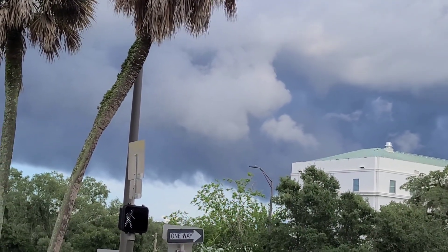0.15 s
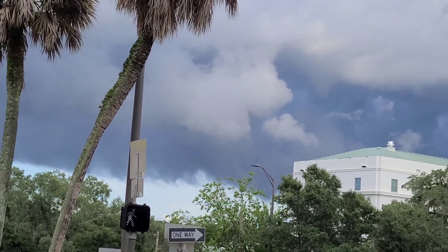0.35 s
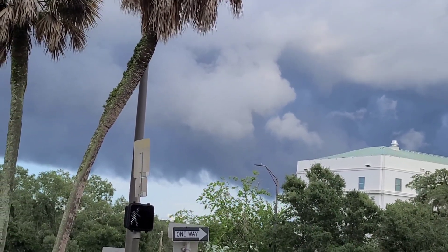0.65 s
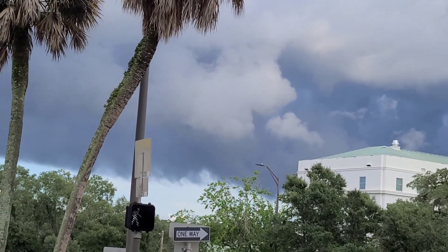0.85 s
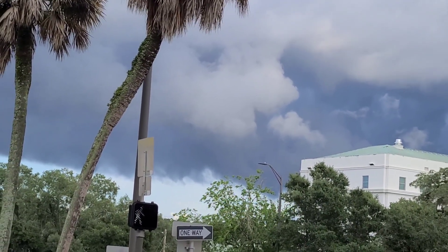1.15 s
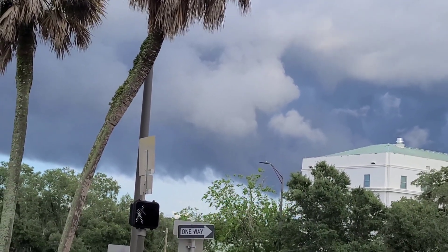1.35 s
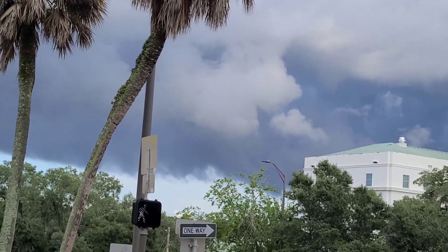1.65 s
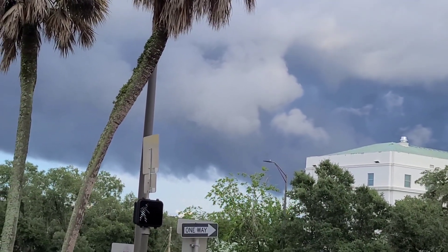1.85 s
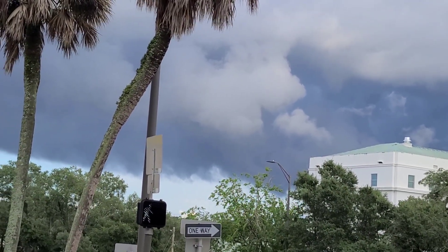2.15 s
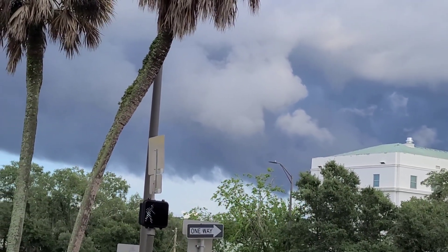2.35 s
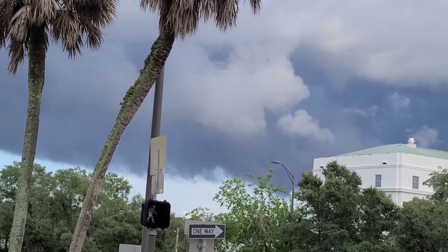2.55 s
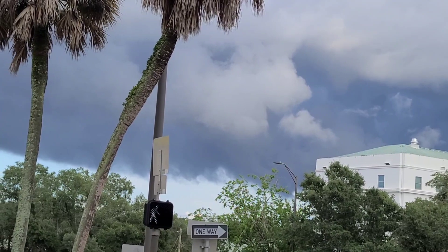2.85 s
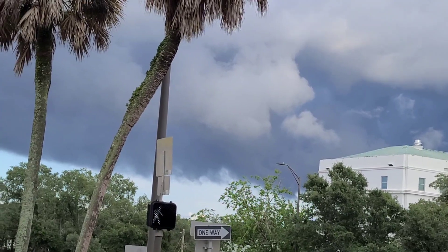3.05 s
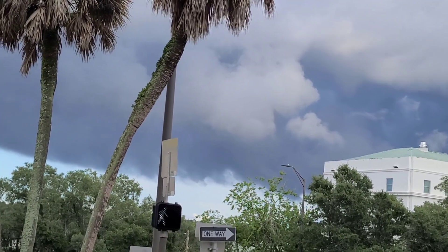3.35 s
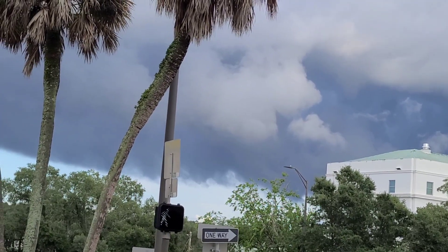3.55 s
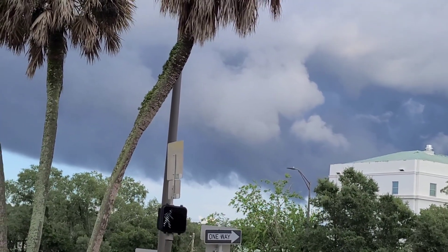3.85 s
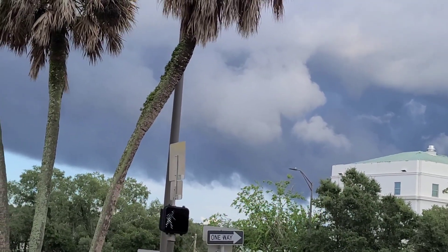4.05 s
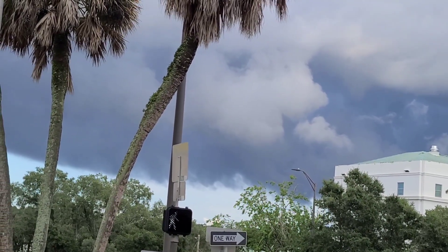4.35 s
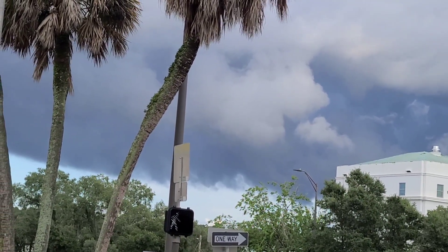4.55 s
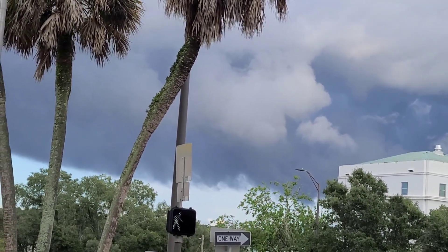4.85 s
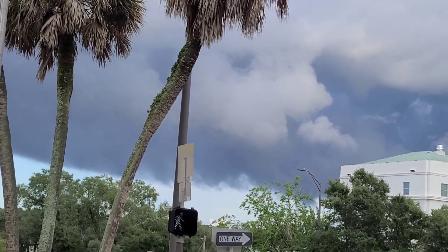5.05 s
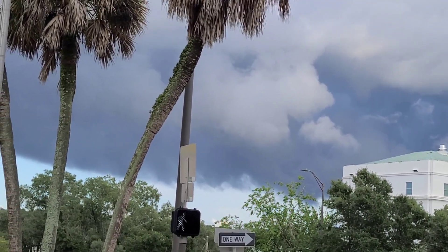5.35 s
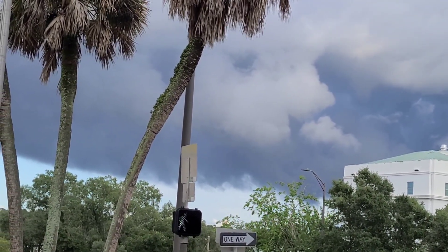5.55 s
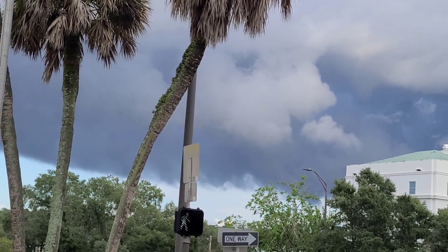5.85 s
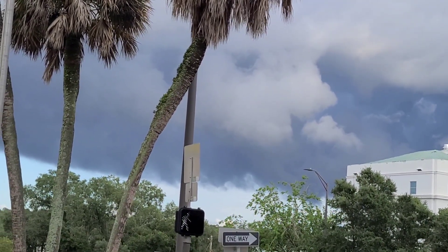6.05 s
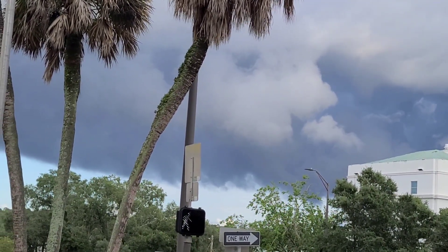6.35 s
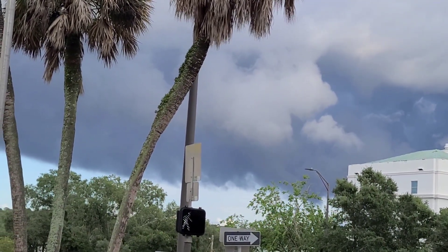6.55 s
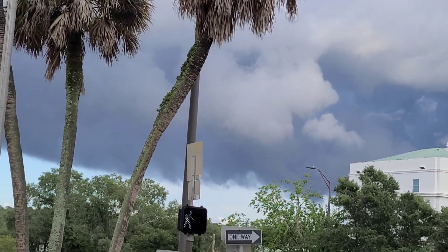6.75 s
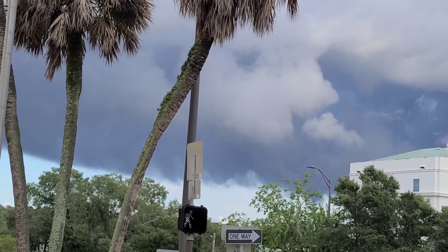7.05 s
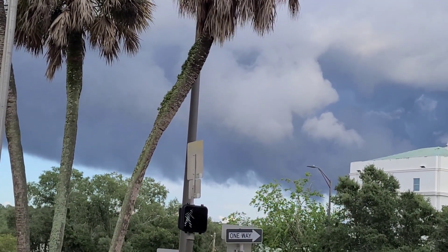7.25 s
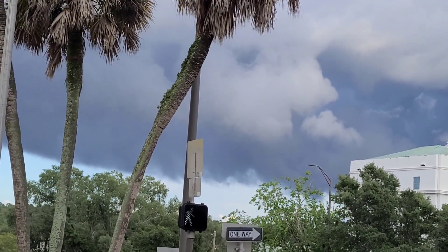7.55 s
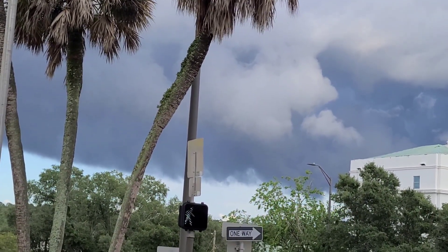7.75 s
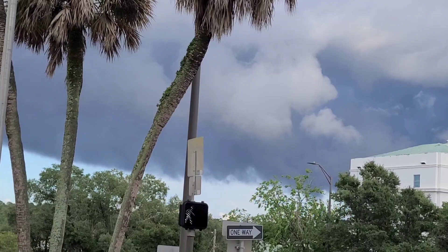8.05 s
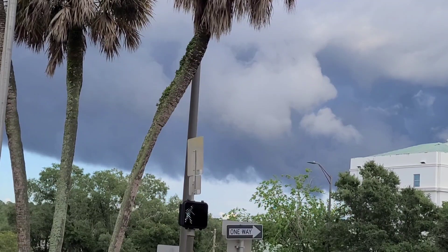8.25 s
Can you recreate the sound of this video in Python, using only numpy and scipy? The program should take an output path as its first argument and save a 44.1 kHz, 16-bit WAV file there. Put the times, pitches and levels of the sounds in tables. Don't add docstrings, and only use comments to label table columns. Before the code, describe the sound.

City street rumble with an idling engine; a loud-exhaust V8 car approaches in throttle pushes, passes burbling and rasping, then slows with thin brake squeal.

```python
import sys
import numpy as np
from scipy import signal
from scipy.io import wavfile
from scipy.ndimage import uniform_filter1d

SR = 44100
rng = np.random.default_rng(int(sys.argv[2]) if len(sys.argv) > 2 else 0)


def linear_from_db(decibels):
    return 10 ** (np.asarray(decibels, float) / 20)


def to_wav(sig):
    pcm = np.clip(np.atleast_2d(sig), -1, 1) * 32767
    pcm = np.round(pcm).astype(np.int16)
    wavfile.write(sys.argv[1], SR, pcm.T)


N = 370881
SLOW = 20

# frequency in Hz, likeness from 0 to 1.
LIKENESS = [(60, 0.97), (180, .985), (300, .97), (520, 0.78), (890, 0.42), (1500, 0.45), (3000, 0.38),
            (12000, 0.25)]
# frequency in Hz, lead in radians.
LEFT_LEAD = [(0, 0), (430, .2), (750, .3), (1300, 1.3), (3000, 9.8), (14000, 45.9)]
# frequency in Hz, left over right in dB.
LEFT_LEAN = [(60, 0.6), (140, 1), (320, 1.5), (490, 5.5), (740, -1), (1130, -0.5), (1710, -6), (2600, -2),
             (5000, -5), (9000, 0.2), (13000, -9)]

# time in seconds, engine cycles per second in Hz.
ENGINE_SPEED = [(0, 15.83), (3.1, 20.1), (3.33, 20.06), (3.65, 18.19), (4.05, 18.3), (5.02, 19.2),
                (5.23, 17.25), (6.1, 17.3), (6.25, 16.95), (6.5, 17.7), (6.66, 17.5), (6.88, 15.55),
                (7.06, 15.07), (7.45, 15.45), (7.61, 15.27), (7.94, 14.4), (8.27, 14.93), (8.41, 14.88)]
# time in seconds, nearness in dB, engine load in dB.
CAR_COURSE = [(0, -39.5, -55), (.4, -41, -29.5), (1, -40, -40), (2, -39, -35.5), (2.6, -40.5, -35),
              (3.2, -36.5, -33), (3.9, -36, -28.5), (4.3, -36, -27.5), (4.75, -33.5, -25),
              (5.1, -30, -18.5), (5.5, -30, -22.5), (5.85, -29, -21), (6.2, -31, -26), (6.6, -31.5, -25.5),
              (6.9, -31, -22.5), (7.35, -31.5, -29), (7.7, -34, -33.5), (8.41, -38, -28)]

# frequency in Hz, level in dB per Hz.
BOOM_COLOUR = [(12, -34), (20, -10.5), (31, -6), (38, -9.5), (48, -8), (64, -2), (86, -7), (100, -6.5),
               (108, -35), (130, -30), (170, -62), (290, -120)]
DISTANT_COLOUR = [(59, -32), (100, 4), (113, -15.5), (160, -3.5), (242, -13), (269, -20), (297, -15),
                  (324, -22.5), (600, -23), (780, -43.5), (1320, -120)]
ROAR_COLOUR = [(520, -2), (600, -11.5), (660, -3.5), (730, -3), (800, -2.5), (870, -12.5), (960, -27.5),
               (1050, -28)]
TYRE_COLOUR = [(850, -15), (1000, -6), (1270, -5.5), (1560, -1), (1750, -4.5), (2000, -10), (2400, -12.5),
               (2700, -21.5), (2900, -26)]
CLATTER_COLOUR = [(850, 0), (950, 0.5), (1100, 0.5), (1250, -3.5), (1450, -5.5)]
AIR_COLOUR = [(2600, 4), (3200, -4), (4000, -5), (4500, -7.5), (5200, -10.5), (6200, -19), (7300, -25.5),
              (8000, -21), (8700, -19.5), (9600, -28), (10400, -15), (11200, -28.5), (12200, -29.5),
              (12900, -40)]
HISS_COLOUR = [(2600, 4.5), (3200, 2.5), (4000, -5.5), (4500, -6.5), (5200, -10), (6200, -12), (7300, -16),
               (8000, -20), (8700, -11.5), (9600, -19.5), (10400, -17.5), (11200, -20), (12200, -28),
               (12900, -40)]
WHISTLE_COLOUR = [(8400, -18.5), (8650, -5), (8750, -1), (8900, 9.5), (9200, -15.5)]
SIZZLE_COLOUR = [(13000, -6), (13400, 0), (13600, -6.5)]

# centre in seconds, peak level in dB, half length in seconds.
BOOM_THUMPS = [(0, -24.5, 0.077), (1.3, -23, 0.14), (1.8, -27.5, 0.15), (2.3, -26, 0.22),
               (2.8, -22.5, 0.11), (3.3, -22.5, 0.19), (3.8, -26, 0.22), (4.3, -27.5, 0.32),
               (6.3, -21, 0.22), (8, -34.5, 0.6)]
TYRES_PASSING = [(0, -47, 0.23), (3.4, -53.5, 0.17), (5, -40.5, 0.79), (5.95, -37.5, 0.68),
                 (7, -37.5, 0.48), (7.6, -37.5, 0.41), (8.2, -38.5, 0.43)]
HISS_SWISHES = [(0, -64.5, 0.43), (.8, -69.5, 0.93), (4.55, -62.5, 0.49), (5.3, -68.5, 0.22),
                (5.8, -58, 0.32), (8.41, -58, 0.32)]
CLATTER_SWELLS = [
    (5.08, -40, 0.11),
    (6.35, -44.5, .12),
    (8.05, -41.5, 0.26),
]
WHISTLE_SWELLS = [(3.3, -79, .4), (4.15, -69.5, .25), (5, -73, 0.43), (6.15, -62, .25), (6.6, -73, 0.14)]
SIZZLE_SWELLS = [
    (5.55, -82, .05),
    (5.8, -76.5, .12),
]
TREAD_SWELLS = [(4.7, -44.5, .3), (5.9, -35.5, 0.38), (6.25, -42, 0.092), (6.9, -44.5, .2),
                (7.7, -41.5, 0.64), (8.3, -42.5, 0.27)]
# time in seconds, frequency in Hz.
TREAD_HZ = [(0, 1515), (5.2, 1540), (5.5, 1400), (5.9, 1550), (6.3, 1604), (6.7, 1514), (8.41, 1575)]

# centre in seconds, frequency in Hz, half length in seconds, level in dB, left over right in dB.
KNOCK_RINGS = [(2.745, 1000, .0025, -31, -5), (2.744, 2050, .0012, -33, -5), (2.7435, 2900, .001, -39, -5),
               (2.774, 2100, .0015, -39, -3), (3.971, 1880, .0015, -31, -8), (3.972, 2750, .0025, -34, -2),
               (3.971, 3100, .0015, -38, -9), (3.972, 3450, .002, -40, -9), (3.971, 2300, .0015, -35, 2),
               (3.977, 2200, .002, -31, -3), (3.982, 1820, .004, -34, -1), (3.979, 1350, .005, -30, -11),
               (3.991, 1400, .005, -33, -10), (3.982, 1600, .003, -40, 4), (3.988, 2150, .003, -41, -8),
               (3.993, 2350, .004, -42, 5), (3.985, 2750, .004, -44, 0), (4.0, 1750, .004, -40, -6),
               (3.975, 3900, .003, -48, 4)]
# start in seconds, level in dB, left over right in dB.
KNOCK_BODIES = [
    (2.7427, -48, -6),
    (3.9693, -40, -5.5),
]
# start in seconds, low edge in Hz, high edge in Hz, level in dB, time to fall 60 dB in seconds.
KNOCK_PUFFS = [
    (2.7427, 7200, 9500, -52, .02),
    (2.7427, 1200, 2900, -39, .015),
    (3.5723, 7600, 11000, -51, .014),
    (3.5723, 11000, 14300, -54, .014),
    (3.812, 8000, 9200, -60, .02),
    (3.82, 13800, 14300, -74, .15),
    (3.9695, 7400, 9800, -51, .06),
    (3.9695, 1600, 2900, -37, .02),
]
# centre in seconds, peak level in dB, half length in seconds.
BRAKE_GRABS = [(7.45, -68, .05), (7.54, -66, .04), (7.67, -69, .05), (7.77, -62, .045), (7.84, -62, .03),
               (7.9, -65, .03), (7.96, -67, .03), (8.08, -73, .06), (8.2, -70, .04), (8.27, -64, .035),
               (8.34, -60, .03), (8.4, -61, .035)]
# time in seconds, frequency in Hz.
BRAKE_HZ = [(7.45, 9392), (7.56, 9410), (7.77, 9365), (7.96, 9395), (8.22, 9378), (8.41, 9366)]

# frequency in Hz, level in dB.
IDLE_HUM = [(43.6, -29.5), (87.2, -36)]
# time in seconds, level in dB.
LOPE_LEVEL = [(4, -34.5), (5.3, -38), (6.0, -49), (6.3, -22.5), (6.5, -25), (6.65, -46), (6.8, -24),
              (7.1, -37.5), (7.4, -30.5)]

NEIGHBOUR_ORDERS = [(9, 3.5), (10, -10), (12, -5), (13, -4), (14, -8.5)]
OVERTONE_ORDERS = [(15, -16), (16, 0.5), (17, -3.5), (18, -10), (19, -3.5), (20, -3.5)]
RASP_ORDERS = [(21, -6.5), (22, -1), (23, 2), (24, -6), (25, -1.5), (26, -3.5), (27, -7.5), (28, -1),
               (29, -1), (30, -1.5), (31, -6), (32, -3.5)]
# time in seconds, centre in Hz, width in Hz, roughness from 0 to 1.
TAIL_PIPE = [(0, 380, 140, 0.67), (3, 408, 112.4, 0.95), (4.502, 420, 150.4, 0.82), (5.2, 437, 129, 0.68),
             (5.45, 401, 90, 0.4), (6.15, 453, 110, 0.73), (6.4, 458, 100.5, 0.7), (6.8, 480, 71, 0.8),
             (7.4, 452, 123, 1), (7.9, 300, 70, 0.91), (8.41, 330, 80.5, 0.93)]

# centre in seconds, peak level in dB, half length in seconds.
FIRING_PUSHES = [(.25, -28.5, 0.077), (1.4, -39.5, 0.4), (2.2, -20.5, 0.13), (2.4, -26, 0.11),
                 (2.56, -25, 0.13), (2.93, -23, 0.16), (3.22, -27, 0.22), (3.57, -16, 0.074),
                 (3.74, -29.5, 0.23), (4.17, -15.5, 0.12), (4.41, -24.5, .1), (4.63, -16, 0.14),
                 (4.95, -10.5, 0.25), (5.15, -13.5, .06), (5.29, -18, 0.066), (5.6, -18, 0.14),
                 (5.92, -17, 0.12), (6.05, -17, 0.081), (6.18, -14, 0.08), (6.4, -13.5, 0.11),
                 (6.55, -13, 0.1), (6.68, -12.5, 0.09), (6.8, -25, .05), (7.22, -33.5, 0.1),
                 (7.45, -34, 0.14), (8.3, -30.5, .12)]
BURBLE_SWELLS = [(.5, -37, 0.062), (1.15, -41, 0.15), (2.19, -28, 0.04), (2.6, -34, 0.22),
                 (3.12, -30, 0.12), (3.29, -27, 0.054), (3.78, -21, 0.1), (4.36, -23, 0.2),
                 (4.64, -21, 0.14), (4.82, -18.5, 0.052), (4.97, -22, 0.1), (5.11, -25.5, .06),
                 (5.28, -14.5, 0.098), (5.52, -16, 0.19), (5.75, -16.5, .11), (5.95, -20, 0.075),
                 (6.1, -20, 0.089), (6.36, -21, 0.065), (6.56, -17.5, 0.11), (6.83, -16, 0.13),
                 (7.06, -18.5, 0.14), (7.29, -17.5, 0.16), (7.49, -17.5, 0.067), (7.75, -29, 0.13),
                 (8.01, -23, 0.12), (8.29, -26, 0.1)]
PIPE_STRAINS = [(2.22, -38, .08), (2.66, -39, 0.18), (2.95, -31.5, 0.24), (3.4, -28, 0.29),
                (4.25, -35.5, 0.66), (5, -26, 0.35), (6.05, -31.5, 0.51), (6.95, -31, 0.33),
                (7.25, -32, 0.54), (7.95, -27.5, 0.15), (8.27, -27, 0.19)]
RASP_SWELLS = [(3.7, -42, 0.26), (4.3, -36, 0.27), (5.05, -34.5, 0.65), (5.55, -28, 0.28), (5.8, -24, 0.15),
               (6.07, -21.5, 0.2), (6.72, -31, 0.21), (8.1, -33, 0.37), (8.41, -29, 0.055)]
MUFFLER_DRONES = [(4.7, -46.5, 0.2), (5.35, -43.5, .15), (5.95, -42, 0.42), (6.4, -44.5, 0.091),
                  (6.75, -40, 0.23), (7.2, -45.5, 0.24)]
# centre in seconds, order, peak level in dB, half length in seconds.
ORDER_FLECKS = [(4.956, 13, -29.5, 0.18), (5.0, 16, -31, .08), (5.14, 16, -29.5, .08),
                (5.02, 19, -34.5, .1), (5.06, 56, -40.5, 0.056), (5.12, 9, -25, .07), (5.42, 14, -28, .15),
                (5.7, 14, -28, .15), (6.1, 14, -34.5, .1), (5.5, 50, -42, .12), (6.179, 41, -36, 0.046),
                (6.31, 65, -39, .035), (6.429, 63, -41.5, .03), (6.74, 42, -33.5, 0.033),
                (6.62, 41, -42, .04), (6.8, 30, -33, .05), (6.82, 18, -29, .05), (6.95, 31, -34.5, .06),
                (6.97, 13, -21.5, 0.08), (7.3, 13, -27.5, 0.18), (7.12, 72, -41, .03),
                (7.201, 19, -33, .15), (7.928, 19, -32, 0.07), (8.1, 22, -32, 0.13), (9.4, 15, -31, 0.059),
                (5.2, 16, -31, .05), (3.1, 26, -42.5, .15), (5.92, 92, -41, .05), (5.78, 90, -44, .04),
                (6.27, 98, -44, .04), (6.9, 46, -39, .04), (7.05, 50, -40, .05), (7.28, 49, -41, .05),
                (7.03, 106, -44, .03), (6.9, 99, -45, .03)]


def evened(x):
    return x / np.sqrt(np.mean(abs(x) ** 2) + 1e-20)


def read(points, hz):
    f, value = np.transpose(points)
    return np.interp(np.log(hz + 1), np.log(f + 1), value)


def follow(rows, t):
    s, *columns = np.transpose(rows)
    return [np.interp(t, s, column) for column in columns]


def swells(rows, t, base_db):
    power = sum(linear_from_db(db) ** 2 * np.exp(-2 * ((t - s) / length) ** 2) for s, db, length in rows)
    return 10 * np.log10(power + linear_from_db(base_db) ** 2)


def wander(count, hz, rate):
    z = rng.standard_normal((count, 2)) @ [1, 1j]
    pole = np.exp(-2 * np.pi * hz / rate)
    return evened(signal.lfilter([1], np.convolve([1, -pole], [1, -pole]), z))


def ports(z, other, hz):
    same = np.clip(read(LIKENESS, hz), 0, 1)
    lean = linear_from_db(read(LEFT_LEAN, hz) / 2)
    delayed = z * np.exp(-1j * np.interp(hz, *np.transpose(LEFT_LEAD)))
    right = same * delayed + np.sqrt(1 - same ** 2) * other
    return np.array([z * lean, right / lean])


def tone(turns, hz, db, rough, flutter_hz, rate):
    rough = np.clip(rough, 0, 1)
    size = np.sqrt(1 - rough ** 2) + rough * wander(len(turns), flutter_hz, rate)
    spin = np.sqrt(2) * linear_from_db(db) * np.exp(2j * np.pi * (turns + rng.random()))
    return ports(size * spin, wander(len(turns), 2.05, rate) * spin, hz).real


def closeness(near_db):
    return near_db + 41


def engine_cycle(t, rate):
    cycle = uniform_filter1d(follow(ENGINE_SPEED, t)[0], size=round(200 * SLOW * rate / SR))
    return cycle, np.cumsum(cycle) / rate


def wash():
    frames, hz = N // 512 + 9, np.fft.rfftfreq(2048, 1 / SR)
    t = (np.arange(frames) * 512 - 2048) / SR
    near_db = follow(CAR_COURSE, t)[0]
    closer = closeness(near_db)
    tyre_db = swells(TYRES_PASSING, t, -40.5)
    layers = [
        (BOOM_COLOUR, swells(BOOM_THUMPS, t, -27) - 2.5),
        (DISTANT_COLOUR, -32 + 0 * t),
        (ROAR_COLOUR, near_db - 7.5),
        (TYRE_COLOUR, tyre_db - 1.5),
        (CLATTER_COLOUR, swells(CLATTER_SWELLS, t, -58.5 + 1.91 * closer)),
        (AIR_COLOUR, -56 + 0 * t),
        (HISS_COLOUR, swells(HISS_SWISHES, t, -71.5 + 1.28 * closer) + 10),
        (WHISTLE_COLOUR, swells(WHISTLE_SWELLS, t, -84)),
        (SIZZLE_COLOUR, swells(SIZZLE_SWELLS, t, -120)),
    ]
    power = np.zeros((len(hz), frames))
    for shape, db in layers:
        inside = (hz >= shape[0][0]) & (hz <= shape[-1][0])
        colour = inside * linear_from_db(read(shape, hz)) ** 2
        power += np.outer(colour / colour.sum(), linear_from_db(db) ** 2)
    ridge = np.exp(-((hz[:, None] - follow(TREAD_HZ, t)[0]) / 80) ** 2)
    power += ridge / ridge.sum(0) * linear_from_db(swells(TREAD_SWELLS, t, tyre_db - 8.5)) ** 2

    a, b, c, d, patches = rng.standard_normal((frames, len(hz), 5)).T
    patches = evened(uniform_filter1d(uniform_filter1d(patches, 9, 0), 8, 1))
    gusts = evened(uniform_filter1d(rng.standard_normal(frames), 4))
    gusts = gusts * np.clip(hz / 8000, 0, 1)[:, None]
    z = ports(a + 1j * b, c + 1j * d, hz[:, None])
    z = z * np.sqrt(power) * linear_from_db(1.3 * patches + 0.31 * gusts)
    sound = signal.istft(z, nperseg=2048, noverlap=1536)[1]
    return 1.152 * sound[:, 2048:][:, :N]


def idle_hum(t, rate):
    return sum(tone(hz * t, hz + 0 * t, db, .42, 3.5, rate) for hz, db in IDLE_HUM)


def sides(left_right_db):
    return linear_from_db(np.array([[left_right_db], [-left_right_db]]) / 2)


def knocks():
    out, t = np.zeros((2, N)), np.arange(3000) / SR

    def place(start, sound):
        out[:, start:start + len(t)] += sound

    for s, hz, length, db, left_right_db in KNOCK_RINGS:
        u = t - t.mean()
        ring = np.sin(2 * np.pi * hz * u + 2 * np.pi * rng.random()) * np.exp(-(u / length) ** 2)
        place(round(s * SR) - len(t) // 2, linear_from_db(db) * sides(left_right_db) * ring)
    body = signal.butter(4, [1000, 2800], "bandpass", fs=SR)
    for s, db, left_right_db in KNOCK_BODIES:
        noise = evened(signal.lfilter(*body, rng.standard_normal((2, len(t)))))
        fade = linear_from_db(db - 60 * t / 0.098) * (1 - np.exp(-t / .002))
        place(round(s * SR), noise * fade * sides(left_right_db))
    for s, low_hz, high_hz, db, t60 in KNOCK_PUFFS:
        band = signal.butter(4, [low_hz, high_hz], "bandpass", fs=SR, output="sos")
        puff = evened(signal.sosfilt(band, rng.standard_normal((2, len(t)))))
        fade = linear_from_db(db - 60 * t / t60) * (1 - np.exp(-t / .0008))
        place(round(s * SR), puff * fade * sides(-5))
    return out


def brake_squeal():
    t = np.arange(N) / SR
    waver = np.array([wander(N, 35, SR), wander(N, 35, SR)])
    size = linear_from_db(swells(BRAKE_GRABS, t, -120)) * (1 + .35 * waver)
    spin = np.exp(2j * np.pi * np.cumsum(follow(BRAKE_HZ, t)[0]) / SR)
    left_lead = np.exp(1j * np.array([[1.7], [0]]))
    return np.sqrt(2) * (size * spin * left_lead).real


def echo_flecks():
    t, out = np.arange(N) / SR, np.zeros((2, N))
    cycle, turns = engine_cycle(t, SR)
    for s, k, db, length in ORDER_FLECKS:
        heard = abs(t - s) < 2 * length
        level_db = swells([(s, db, length)], t[heard], -120)
        out[:, heard] += tone(k * turns[heard], k * cycle[heard], level_db, .3, 10, SR)
    return out


def muffler(t, rate):
    cycle, turns = engine_cycle(t, rate)
    roar_db = follow(CAR_COURSE, t)[0] - 16
    drone_db = swells(MUFFLER_DRONES, t, -70.5)
    out = 0
    for k in range(33, 56):
        hz = k * cycle
        ringing_db = drone_db - 6 * ((hz - 726) / 63) ** 2
        db = np.maximum(roar_db + read(ROAR_COLOUR, hz), ringing_db)
        out = out + tone(k * turns, hz, db, .6, 10, rate)
    return out


def exhaust(t, rate):
    cycle, turns = engine_cycle(t, rate)
    near_db, load_db = follow(CAR_COURSE, t)
    closer = closeness(near_db)
    firing_db = swells(FIRING_PUSHES, t, -58 + 0.38 * closer)
    burble_db = swells(BURBLE_SWELLS, t, -46 + 1.64 * closer)
    lope_db = np.interp(t, *np.transpose(LOPE_LEVEL), left=-70, right=-70)
    overtone_db = swells(PIPE_STRAINS, t, -47 + closer)
    rasp_db = swells(RASP_SWELLS, t, -50.5 + 1.59 * closer)
    pipe_hz, pipe_width_hz, rasp_rough = follow(TAIL_PIPE, t)

    out = tone(8 * turns, 8 * cycle, firing_db, .22 + .018 * (10 - closer), 11, rate)
    out += tone(11 * turns, 11 * cycle, burble_db, .25 + .025 * (10 - closer), 8, rate)
    out += tone(5 * turns, 5 * cycle, lope_db, .4, 5, rate)
    families = [  # orders, level in dB, roughness, whether the tail pipe shapes it
        (NEIGHBOUR_ORDERS, load_db, .55, 0),
        (OVERTONE_ORDERS, overtone_db, .5, 0),
        (RASP_ORDERS, rasp_db, rasp_rough, 1),
    ]
    for family, total_db, rough, piped in families:
        levels = np.array([db - piped * 6 * ((k * cycle - pipe_hz) / pipe_width_hz) ** 2 for k, db in family])
        levels += total_db - 10 * np.log10((linear_from_db(levels) ** 2).sum(0))
        for (k, _), db in zip(family, levels):
            out += tone(k * turns, k * cycle, db, rough, 14, rate)
    return out


def engines():
    rate = SR / SLOW
    t = np.arange(N // SLOW + 1) / rate
    out = idle_hum(t, rate) + muffler(t, rate) + exhaust(t, rate)
    return signal.resample_poly(out, SLOW, 1, axis=1)[:, :N]


def scene():
    return wash() + knocks() + brake_squeal() + echo_flecks() + engines()


def band_limit(x):
    return signal.sosfilt(signal.butter(12, 14300, fs=SR, output="sos"), x)


def record(dry):
    return band_limit(dry)


dry = scene()
out = record(dry)
to_wav(out)
```